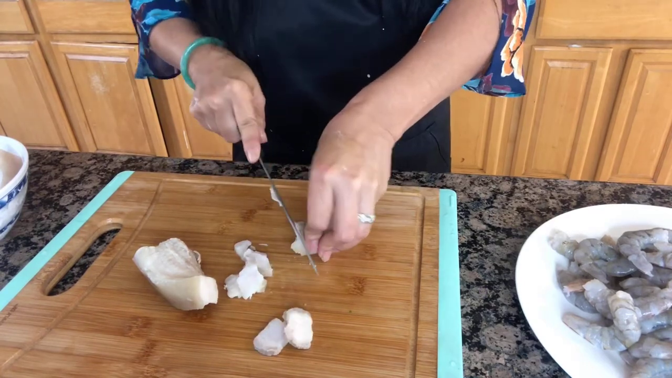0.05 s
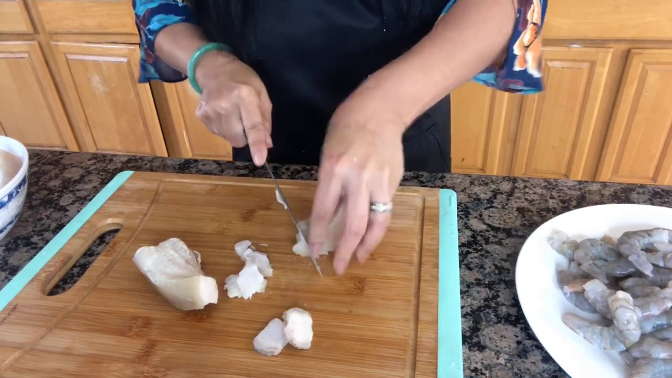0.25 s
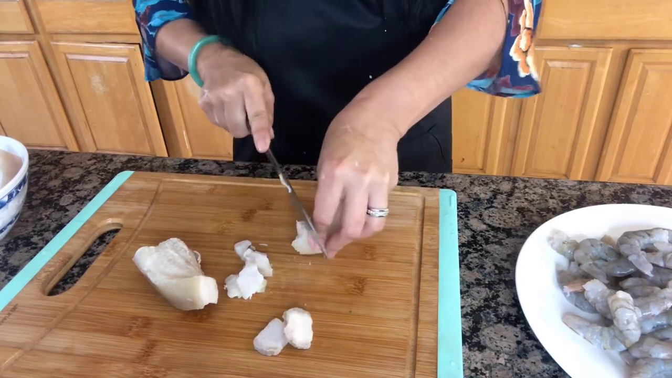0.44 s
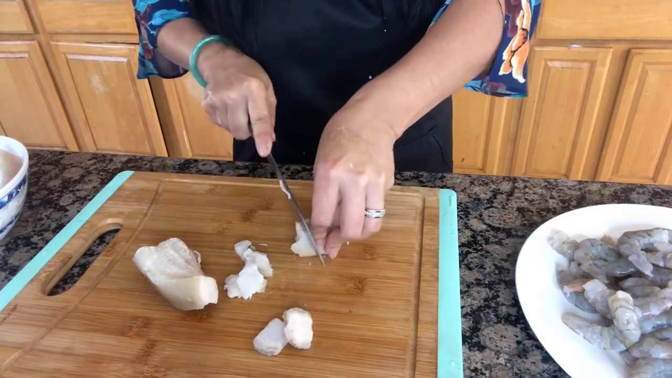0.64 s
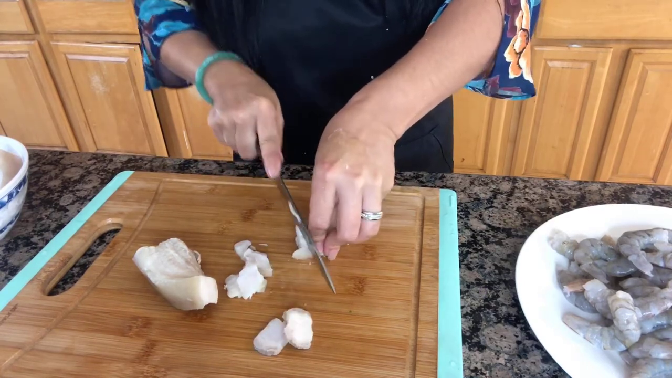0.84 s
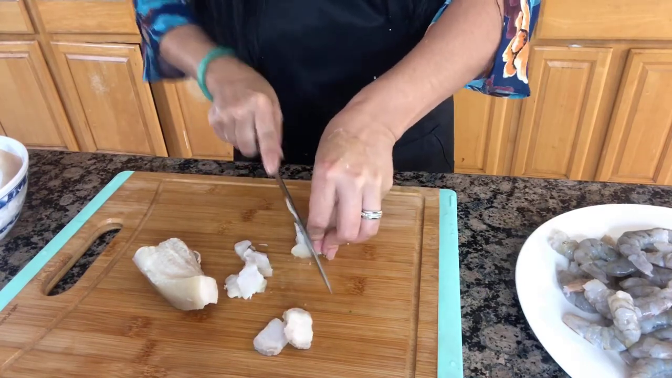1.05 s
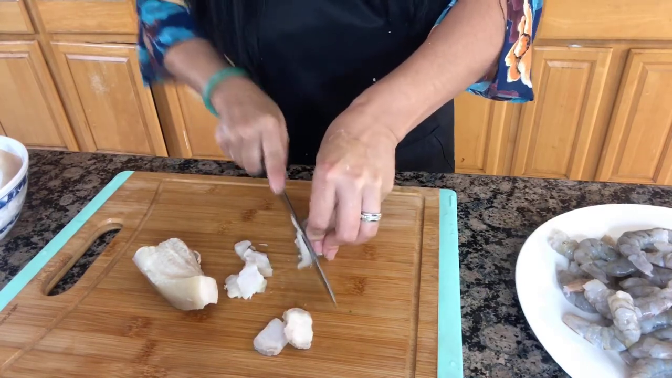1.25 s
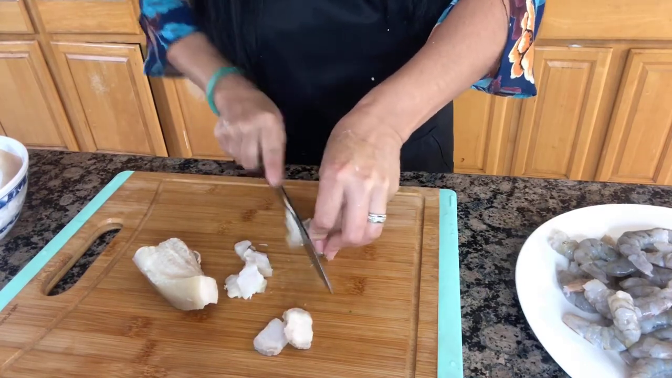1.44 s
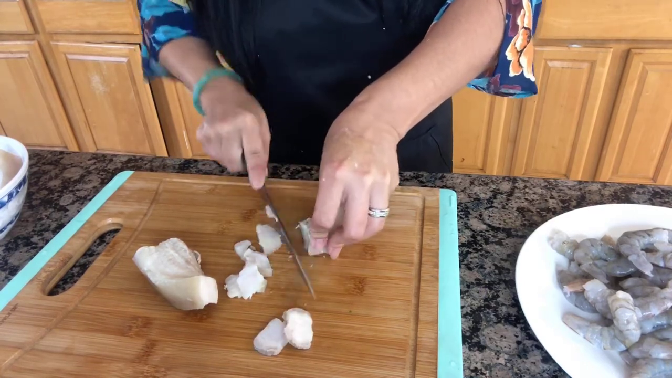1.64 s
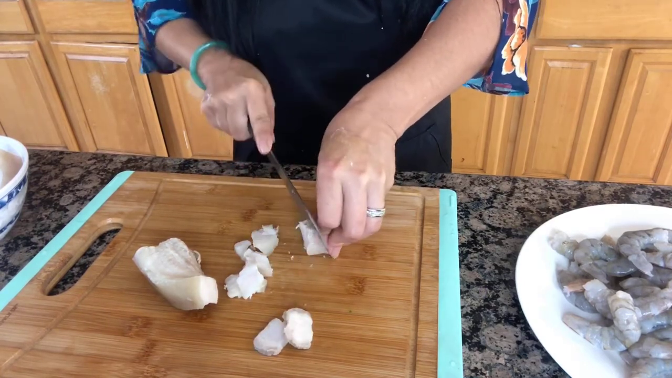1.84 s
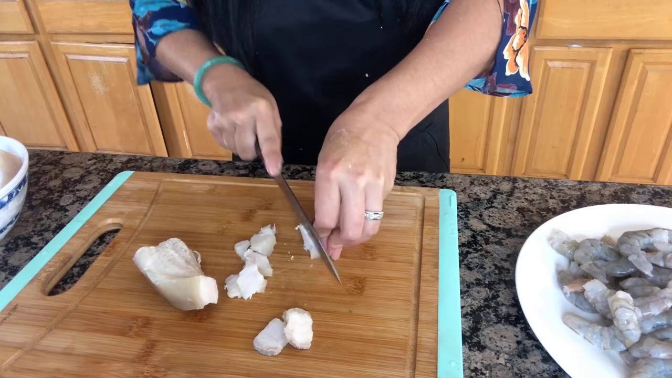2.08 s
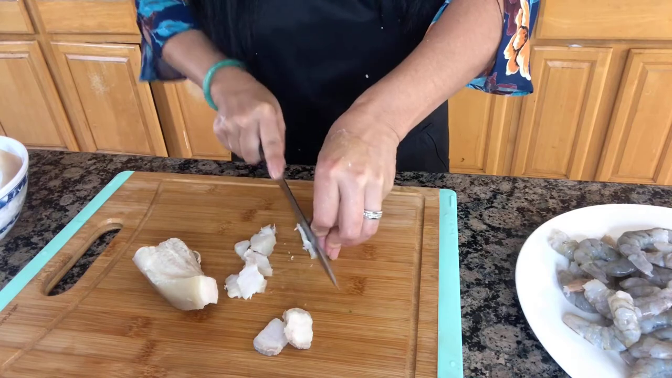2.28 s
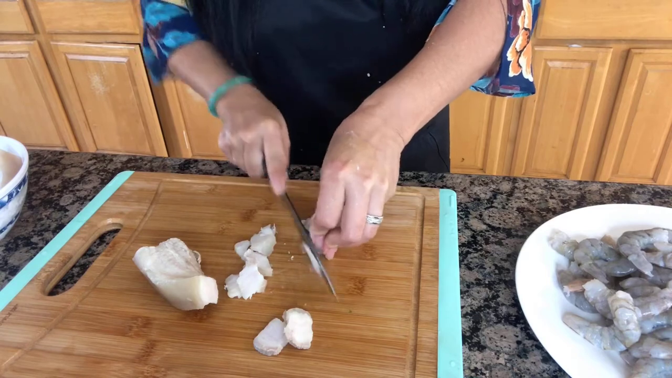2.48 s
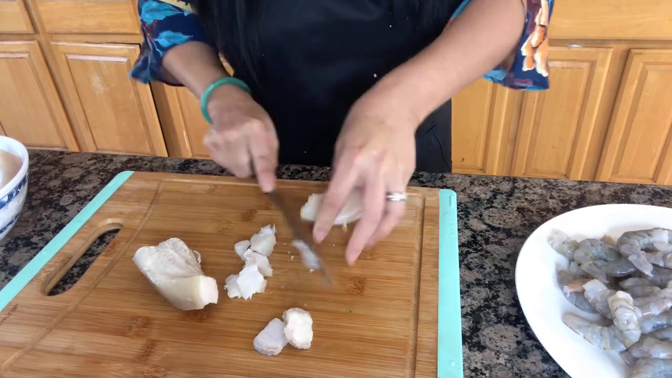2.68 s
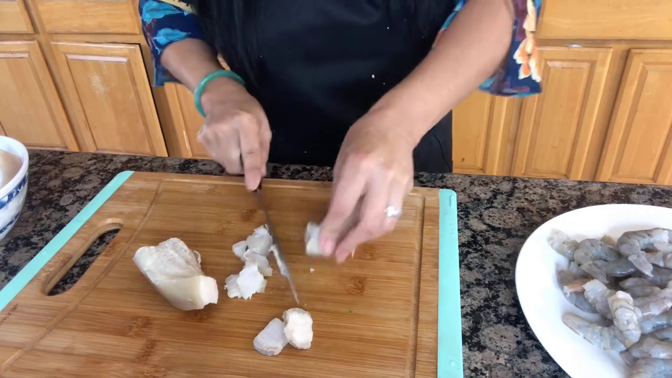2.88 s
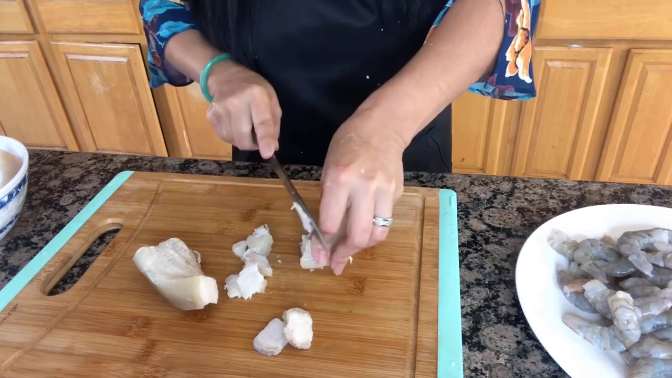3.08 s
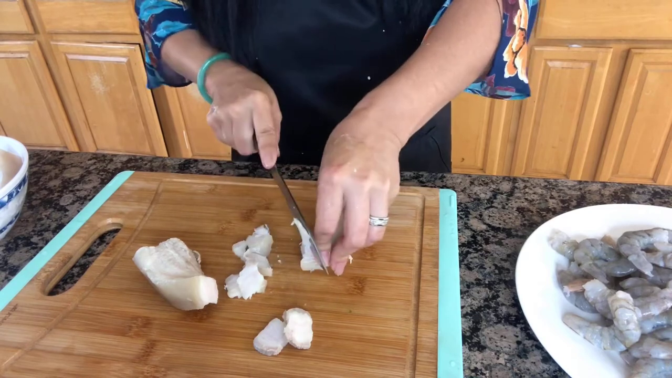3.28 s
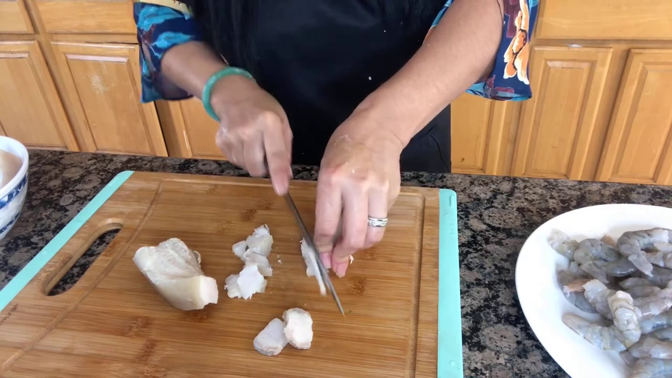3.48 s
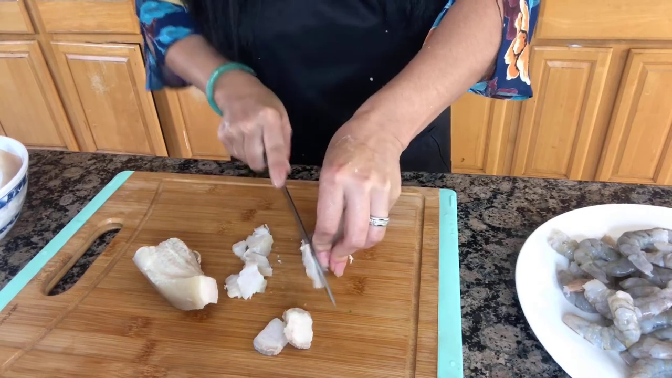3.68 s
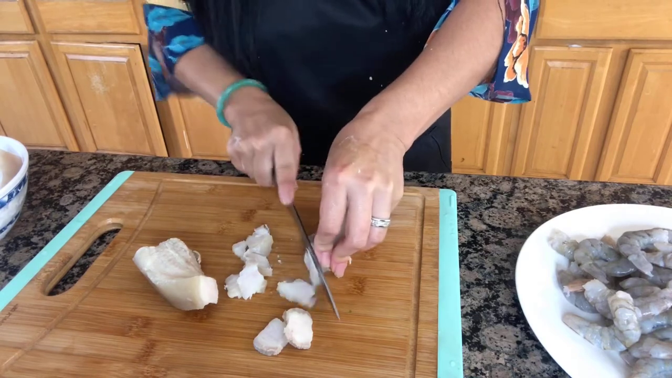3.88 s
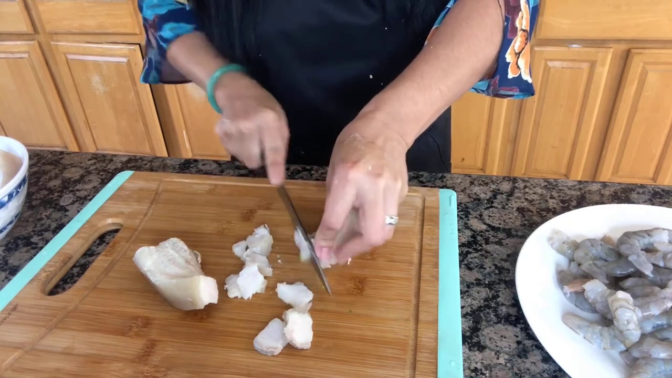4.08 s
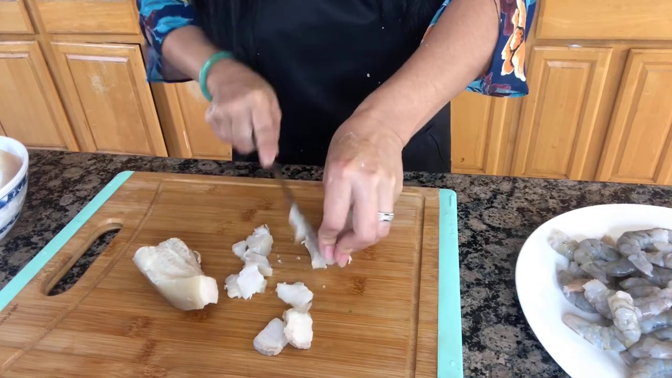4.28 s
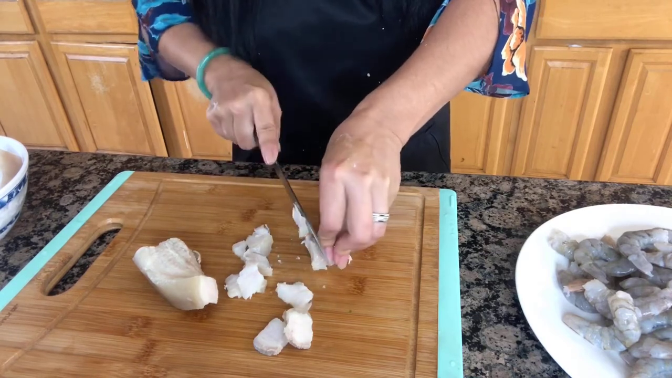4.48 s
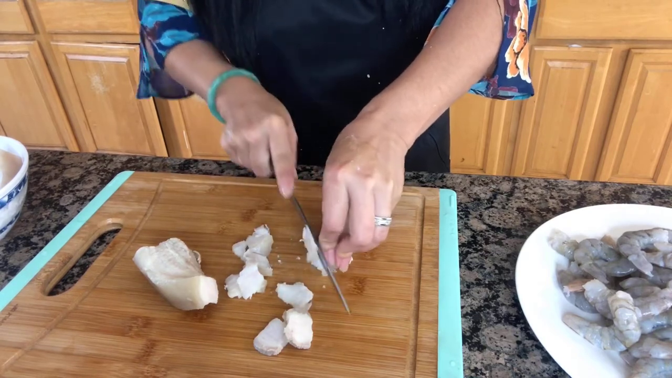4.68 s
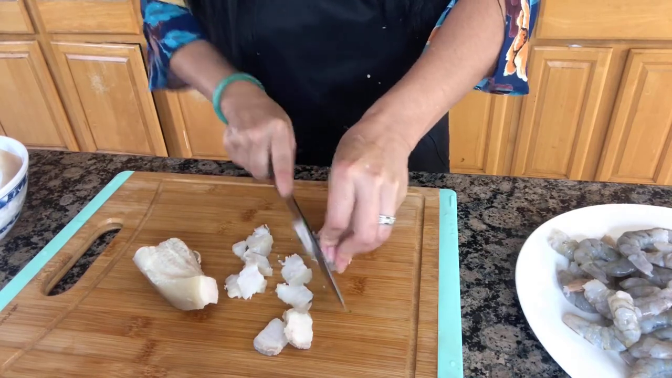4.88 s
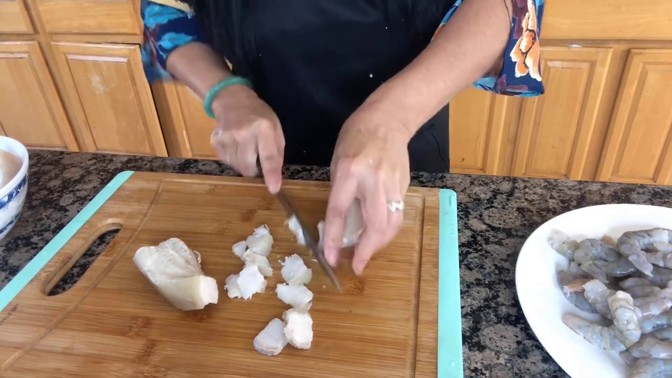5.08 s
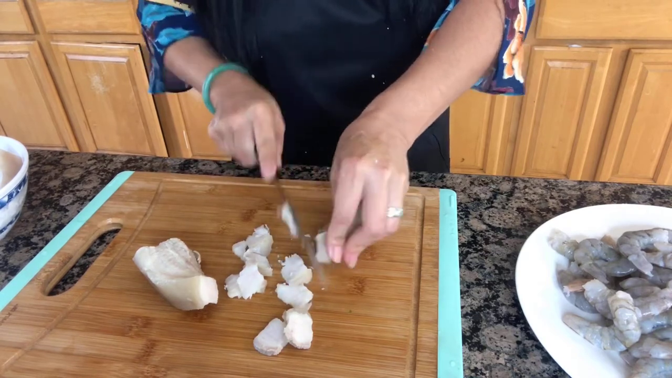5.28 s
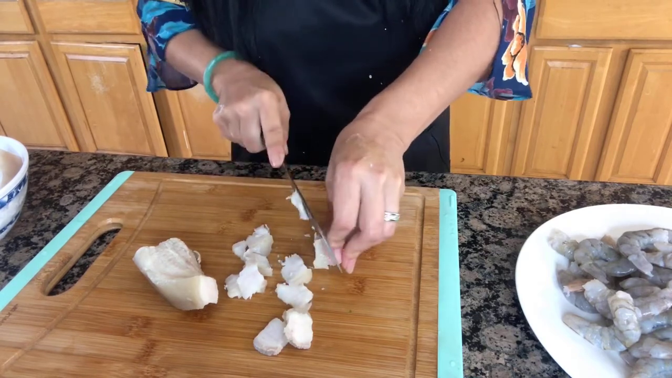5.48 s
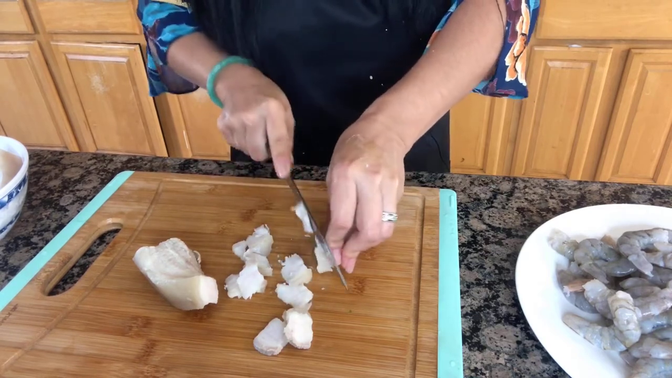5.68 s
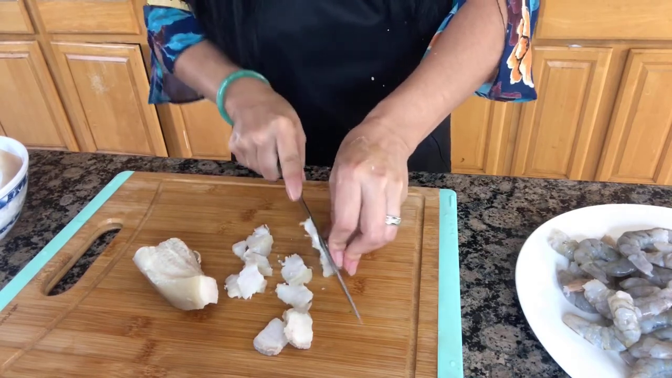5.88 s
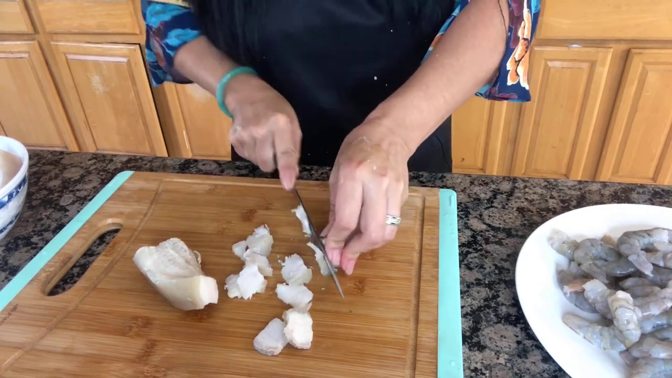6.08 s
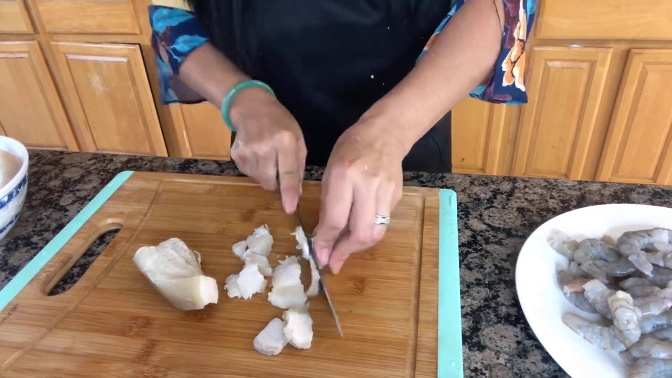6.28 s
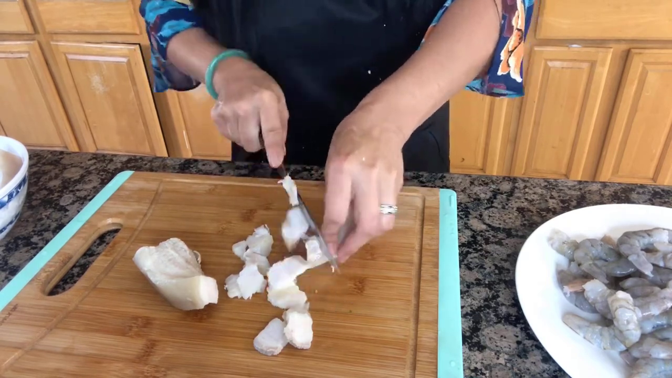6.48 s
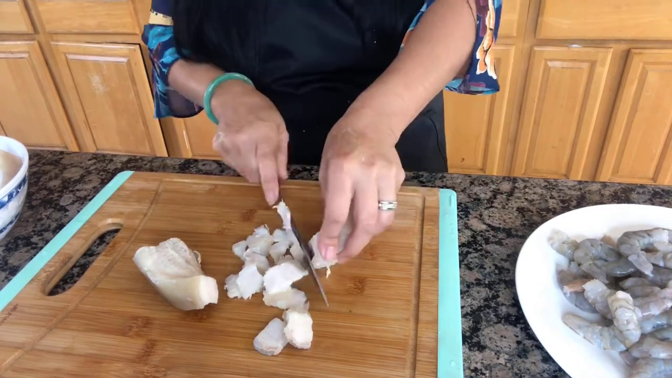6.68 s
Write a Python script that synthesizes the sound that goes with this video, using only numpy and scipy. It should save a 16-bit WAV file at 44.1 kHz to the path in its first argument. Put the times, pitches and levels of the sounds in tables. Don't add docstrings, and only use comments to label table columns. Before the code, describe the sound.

A blade works in four or five brief bursts separated by near-quiet. Each begins with a soft, sticky tearing through fat, then the edge clicks or knocks on a thin bamboo board and scrapes along it with a grainy rasp. Two knocks are far louder, cracking into overload. Close stereo pickup leaning slightly left, short room reverberation, steady dull refrigerator hum, sudden ending.

```python
import sys
import numpy as np
from scipy import signal
from scipy.io import wavfile
from scipy.ndimage import uniform_filter1d

SR = 44100
rng = np.random.default_rng(int(sys.argv[2]) if len(sys.argv) > 2 else 0)


def log_audio(samples):
    frames = np.atleast_2d(samples).T
    limited = np.clip(frames, -1, 1)
    pcm = np.round(limited * 32767).astype(np.int16)
    wavfile.write(sys.argv[1], SR, pcm)


def how_loud(loudness_db):
    steps = np.asarray(loudness_db, float) / 20
    return 10 ** steps


N = 297228


def evened(x):
    return x / np.sqrt(np.mean(x ** 2) + 1e-20)


def read(points, hz):
    f, value = np.transpose(points)
    return np.interp(np.log(hz + 1), np.log(f + 1), value)


def play(events, voice):
    track = np.zeros(N)
    for s, *settings in events:
        sound = voice(*settings)
        part = track[round(s * SR):][:len(sound)]
        part += sound[:len(part)]
    return track


def colour(x, gain_db):
    hz = abs(np.fft.fftfreq(4096, 1 / SR))
    log_gain = np.log(how_loud(np.maximum(gain_db(hz), -100)))
    phase = -signal.hilbert(log_gain).imag
    taps = np.fft.ifft(np.exp(log_gain + 1j * phase)).real[:2048]
    return signal.oaconvolve(x, taps)[:len(x)]


def resonate(x, hz, width):
    turn = np.exp(2j * np.pi * np.cumsum(hz * np.ones(x.shape[-1])) / SR)
    r = np.exp(-np.pi * width / SR)
    return 2 * (turn * signal.lfilter([1 - r], [1, -r], x / turn)).real


def band(x, lo_hz, hi_hz):
    sos = signal.butter(3, [lo_hz, hi_hz], "bandpass", fs=SR, output="sos")
    return evened(signal.sosfilt(sos, x))


def patchy(x, depth_db):
    z = signal.stft(x, nperseg=256, noverlap=192)[2]
    patches = rng.standard_normal(z.shape[::-1]).T
    patches = uniform_filter1d(patches, size=4, axis=0)
    patches = evened(uniform_filter1d(patches, size=22, axis=1))
    return signal.istft(z * how_loud(depth_db * patches), nperseg=256, noverlap=192)[1][:len(x)]


def arch(s, rise_s, fall_s, power):
    late = np.arange(0, N, 32) / SR - s
    return -25 * abs(late / np.where(late < 0, rise_s, fall_s)) ** power


# (frequency [Hz], level [dB per Hz])
WASH_SPECTRUM = [(28, -33.5), (40, -5.5), (65, -14), (90, -28), (130, -7), (220, -7), (320, -5), (480, -10),
                 (640, -12), (1350, -14.5), (1750, -24.5), (2000, -33), (3500, -32.5), (15500, -45)]
# (frequency [Hz], correlation [-1 to 1])
WASH_LIKENESS = [(60, 0.94), (180, 0.86), (550, 0.49), (1650, 0.4), (4970, 0.67), (15000, 0.67)]
# (frequency [Hz], left minus right [dB])
WASH_LEAN = [(60, 2.5), (240, 0.5), (950, 1), (3770, 0.5), (15000, 1)]
# (frequency [Hz], width [Hz], level [dB])
HUM_LINES = [(59.5, 5.8, -67), (120.4, 9.2, -64), (156.6, 9.1, -54), (198.5, 3.7, -72), (292, 6.7, -62.5)]


def fridge(wash_db=-45.5):
    frames, hz = N // 512 + 5, np.fft.rfftfreq(2048, 1 / SR)
    a, b, c, d = rng.standard_normal((frames, 1025, 4)).T
    same, left = read(WASH_LIKENESS, hz)[:, None], a + 1j * b
    right = same * left + np.sqrt(1 - same ** 2) * (c + 1j * d)
    lean_db = np.array([.5, -.5])[:, None] * read(WASH_LEAN, hz)
    z = np.array([left, right]) * how_loud(read(WASH_SPECTRUM, hz) + lean_db)[:, :, None]
    wash = how_loud(wash_db) * evened(signal.istft(z, nperseg=2048, noverlap=1536)[1][:, :N])
    air = rng.standard_normal(N) + .5 * rng.standard_normal((2, N))
    hum = 0
    for f, width, db in HUM_LINES:
        hum = hum + how_loud(db) * evened(resonate(resonate(air, f, width), f, width))
    return wash + hum * how_loud([[.8], [-.8]])


REST_HZ = 1100


def pressure():
    rest_db = np.array([-61, -58, -75.5, -80])
    rest = (rest_db[:, None] + 0 * arch(0, 1, 1, 1), REST_HZ)
    moves = [rest] + cuts() + shudders() + saws()
    power = sum(how_loud(2 * db) for db, hz in moves)
    contact_hz = sum(hz * how_loud(2 * db[0]) for db, hz in moves) / power[0]
    curves = [*np.sqrt(power), contact_hz]
    return [np.interp(np.arange(N), np.arange(0, N, 32), curve) for curve in curves]


# (frequency [Hz], level [dB per Hz])
RUB_SPECTRUM = [(180, -43), (400, 3), (800, -3.5), (1100, 4.5), (1700, -4.5), (2500, -1.5), (3300, -5.5),
                (4700, -4), (6300, -12.5), (8000, -20.5), (11000, -21), (16000, -32.5)]
# (frequency [Hz], width [Hz], level [dB])
RUBBED_MODES = [(829, 100, 0.5), (1066, 43, -2), (1753, 190, 8.5), (2270, 220, -11.5), (3410, 69, -9),
                (3790, 4.8, -14.5), (4500, 11, -13.5), (6140, 110, -19.5)]


def strokes(slips_per_s=4000, spread_db=4, grit_db=3.5, ring_db=6, contact_db=6, contact_width=600):
    *gains, contact_hz = pressure()
    slips = how_loud(spread_db * np.minimum(rng.exponential(1, N), 3)) * (rng.random(N) < slips_per_s / SR)
    grit = evened(slips * rng.choice([-1, 1], N))
    drive = rng.standard_normal(N) + how_loud(grit_db) * grit
    drive = colour(patchy(drive, depth_db=2.1), lambda hz: read(RUB_SPECTRUM, hz))
    modes = sum(resonate(drive, f, width) * how_loud(0.44 * db) for f, width, db in RUBBED_MODES)
    drive = drive + how_loud(ring_db) * modes
    drive = drive + how_loud(contact_db) * resonate(drive, contact_hz, contact_width)
    edges = [(800, 2800), (350, 800), (2800, 7000), (7000, 16500)]  # board, thrum, rasp, fizz [Hz]
    return sum(gain * band(drive, *edge) for edge, gain in zip(edges, gains))


# (deepest at time [s], rasp level [dB], lean-in [s], let-go [s], fizz re rasp [dB])
FAT_CUTS = [(.11, -62, 0.08, 0.18, -7), (.25, -65, .1, 0.13, -15), (.71, -65, 0.089, 0.17, -1),
            (1.05, -54.5, 0.049, .12, 1.5), (1.14, -60, 0.085, .1, -3), (1.22, -54.5, 0.14, .03, 1),
            (2.08, -65.5, 0.18, 0.18, 0), (2.31, -48, 0.066, 0.13, 0), (2.346, -54.5, 0.051, 0.023, 4),
            (3.4, -73, 0.15, 0.35, 1), (3.68, -56, .15, 0.13, -0.5), (3.79, -51.5, 0.041, 0.11, -3),
            (3.845, -54, .05, 0.046, -1), (4.64, -62.5, 0.24, 0.092, 3.5), (4.698, -49.5, 0.04, .015, -2),
            (5.67, -63.5, 0.18, 0.16, -2), (5.78, -64.5, 0.076, 0.13, 2), (5.93, -56.5, 0.093, 0.071, -3.5),
            (5.99, -48.5, 0.082, 0.079, -1.5)]


def cuts(board_db=0, thrum_db=-6, roundness=1.6):
    moves = []
    for s, db, rise_s, fall_s, fizz_db in FAT_CUTS:
        mix_db = np.c_[[board_db, thrum_db, 0, fizz_db]]
        moves.append((db + mix_db + arch(s, rise_s, fall_s, roundness), REST_HZ))
    return moves


# (time [s], peak level [dB], centre [Hz], width [share of the centre])
FAT_TICKS = [(0.136, -34.5, 10400, 0.34), (0.145, -43, 10700, 0.52), (0.3005, -42, 10800, 0.55),
             (1.019, -29, 10900, 0.83), (1.166, -40, 10600, 0.7), (1.2085, -29, 10500, 0.88),
             (1.2291, -21, 8540, 0.46), (1.2386, -17.5, 10500, 0.85), (2.2515, -34.5, 13800, 0.6),
             (2.2673, -34, 10700, 0.79), (3.6368, -36, 11540, 0.25), (3.8633, -15, 7350, 1),
             (3.892, -35, 7840, 0.54), (4.776, -38, 7200, 0.75), (4.808, -37, 8500, .7),
             (5.716, -37, 14300, 0.47), (5.7264, -41, 14500, 0.39), (5.835, -41.5, 9960, 0.6),
             (5.8494, -47, 9920, 0.6), (5.885, -40, 13300, 0.6), (5.8977, -40, 10700, 0.6),
             (5.9663, -39, 11000, 0.8), (6.052, -31.5, 11000, .9)]
# (time [s], peak level [dB], centre [Hz], width [share of the centre])
BLADE_TICKS = [(0.223, -43, 4000, 0.66), (0.2265, -40, 3120, 0.87), (0.265, -45, 3730, 0.6),
               (0.2737, -38, 3860, 0.81), (1.1002, -34, 3560, 0.87), (1.1273, -49, 3610, 0.6),
               (1.1857, -33, 4960, 1), (2.297, -34, 4000, 0.9), (2.6364, -47, 3110, 0.66),
               (3.7134, -47, 5040, 0.6), (3.7898, -41, 3720, 0.6), (3.8, -42, 3480, 0.78),
               (3.8314, -41, 3560, 0.75), (6.0048, -31, 3040, 0.95)]


def tick(db, hz, share, cycles=55):
    t = np.arange(2000) / SR
    burst = rng.standard_normal(len(t)) * how_loud(-60 * t * hz / cycles)
    width = share * hz
    skirt = resonate(burst, hz, width)
    burst = resonate(skirt, hz, width) + .35 * np.diff(skirt, prepend=0)
    return how_loud(db) * burst / abs(burst).max()


# (time [s], peak level [dB], frequency [Hz], t60 [s])
BLADE_RINGS = [
    (2.683, -25, 3470, 0.041),
    (2.683, -31, 5050, 0.035),
    (2.297, -34.5, 5120, 0.015),
    (0.97, -62, 3400, 0.021),
    (3.8579, -14, 1680, 0.014),
]


def ring(db, hz, t60):
    t = np.arange(4000) / SR
    return how_loud(db - 60 * t / t60) * np.sin(2 * np.pi * hz * t)


# (time [s], peak level [dB], place along the board [0-1], crack level [dB],
# damping by the hand [factor on ring time])
BOARD_KNOCKS = [(1.2377, -29.5, 0.3, 6, 0.51), (1.539, -34, 0.4, -6, .9), (2.3622, 7.5, .05, -25.5, 0.53),
                (2.366, -22, 0.06, -31, 0.75), (2.3704, -16.5, 0.6, -32.5, 0.51),
                (2.3872, -21.5, 0.4, -26, 0.51), (2.297, -34, .5, -3.5, .3), (2.487, -22, 0.5, -19, .5),
                (2.681, -33, 0.2, -25, 1.2), (3.8575, -17, 0.1, -10.5, 0.44), (3.8648, -25.5, 0.7, 4, 0.54),
                (4.126, -26.5, 0.36, -10, 1.6), (4.7107, 8, 0.95, -18, 0.55),
                (4.7128, -2.5, 0.99, -35, 0.3), (4.721, -13.5, 0.96, -28, 0.66),
                (4.721, -12, 1, -34.5, 0.54), (5.0845, -13, .95, -21, 0.54), (5.107, -40, 0.7, -25, 0.86),
                (6.0525, -24.5, 0.3, -0.5, 0.42)]
# (frequency [Hz], level [dB], t60 [s])
NEAR_MODES = [(550, -12, 0.15), (830, -2, 0.087), (1064, 1.5, 0.038), (1734, -8, 0.12), (1950, -3.5, 0.026),
              (2262, 6.5, 0.0092), (2820, -20, 0.039), (3837, -31.5, .03), (4320, -46, 0.011)]
# (frequency [Hz], level [dB], t60 [s])
FAR_MODES = [(570, -8.5, 0.13), (1072, -8, 0.06), (1430, 7.5, 0.0347), (1809, -4, 0.067),
             (1910, 1.5, 0.022), (2385, -2.5, 0.043), (2770, -36, 5.0), (3400, -28, 0.035),
             (4362, -28, 0.027), (4581, -34.5, 0.052)]
# (frequency [Hz], level [dB per Hz])
CRACK_SPECTRUM = [(590, -38), (1000, 5.5), (1430, 14.5), (2410, -5), (3380, -9.5), (6780, -28),
                  (16000, -65)]


def knock(db, place, crack_db, damping):
    t = np.arange(8000) / SR

    def ringing(modes):
        total = 0
        for f, level_db, t60 in modes:
            decay_s = np.clip(t60, .005, .1) * damping
            total = total + how_loud(level_db - 60 * t / decay_s) * np.sin(2 * np.pi * f * t)
        return total

    body = -(1 - place) * ringing(NEAR_MODES) - place * ringing(FAR_MODES)
    patch_hz = 2250 - 450 * place
    body -= 0.78 * how_loud(-60 * t / 0.0054) * np.sin(2 * np.pi * patch_hz * t)
    body = signal.lfilter(np.hanning(11), 1, body)
    body = band(np.diff(body, prepend=0) + 0.15 * body, 480, 12000)
    crack = rng.standard_normal(len(t)) * how_loud(-60 * t / 0.0067)
    crack = colour(crack, lambda hz: read(CRACK_SPECTRUM, hz) + 6 * np.log2(hz / 2000 + 0.062))
    return how_loud(db) * (body / abs(body).max() + how_loud(crack_db) * crack / abs(crack).max())


# (time [s], level [dB], dying time [s], low thrum re level [dB], contact resonance [Hz])
BOARD_SHUDDERS = [(1.245, -39, 0.025, 10, 1610), (1.55, -42.5, 0.097, 11, 1390),
                  (1.599, -37.5, .035, 9, 1200), (2.385, -29.5, 0.2, -6, 1115),
                  (2.684, -41, 0.054, 11, 1181), (3.866, -36.5, .03, 1.5, 947),
                  (4.133, -44.5, 0.061, 4, 1427), (4.73, -26.5, 0.11, -1.5, 1598),
                  (5.092, -29, .025, -1, 1900), (5.108, -40, .055, 5, 1100), (6.06, -39.5, .02, 8, 1002)]


def shudders(rise_s=.016, rasp_db=-15, fizz_db=-26.5, roundness=1.06):
    moves = []
    for s, db, fall_s, thrum_db, hz in BOARD_SHUDDERS:
        mix_db = np.c_[[0, thrum_db, rasp_db, fizz_db]]
        moves.append((db + mix_db + arch(s, rise_s, fall_s, roundness), hz))
    return moves


# (hardest at time [s], pressure level [dB], lean-in [s], let-go [s], contact resonance [Hz])
BOARD_SAWS = [(1.25, -35.5, 0.018, 0.077, 1692), (1.39, -33.5, .065, 0.079, 1990),
              (1.435, -36, 0.059, 0.078, 1700), (1.542, -34.5, 0.015, 0.13, 1498),
              (1.585, -31.5, 0.069, 0.044, 1258), (2.43, -32, 0.053, 0.081, 1898),
              (2.48, -37.5, 0.065, 0.036, 1700), (2.602, -42.5, 0.097, 0.27, 1440),
              (2.69, -35.5, 0.08, 0.097, 1290), (3.88, -39.5, 0.037, 0.055, 1380),
              (4.01, -34, 0.079, 0.067, 1850), (4.058, -37, 0.068, .05, 1690),
              (4.133, -36.5, 0.021, 0.046, 1460), (4.85, -32, 0.077, 0.1, 1800),
              (4.905, -36.5, 0.14, 0.075, 947), (5.04, -36.5, 0.072, 0.089, 1150),
              (5.085, -37, 0.064, .04, 1900), (6.005, -43.5, .025, 0.051, 1500),
              (6.11, -37, 0.069, 0.066, 1840)]


def saws():
    mix_db = np.c_[[0.4, -12.5, -4, -12]]
    follow = np.c_[[1.06, 0.55, 1.18, 1.6]]
    roundness = np.c_[[1.8, 2, 2, 2.6]]
    moves = []
    for s, db, rise_s, fall_s, hz in BOARD_SAWS:
        moves.append((db + mix_db + follow * arch(s, rise_s, fall_s, roundness), hz))
    return moves


# (time [s], peak level [dB])
COUNTER_THUMPS = [
    (2.362, -42),
    (2.635, -41),
    (4.711, -45.5),
]


def thump(db):
    return ring(db, hz=70, t60=.15)


# (time [s], level [dB])
WHINE_LEVEL = [
    (3.12, -96),
    (3.2, -76),
    (3.38, -69),
    (3.45, -88),
]


def whine(hz=3380, width=90):
    s, db = np.transpose(WHINE_LEVEL)
    line = resonate(resonate(rng.standard_normal(N), hz, width), hz, width)
    return how_loud(np.interp(np.arange(N) / SR, s, db)) * evened(line)


# (frequency [Hz], t60 [s])
KITCHEN_DECAY = [(300, 0.41), (1500, 0.2), (8000, 0.23)]


def kitchen(x):
    taps = np.zeros((2, SR // 2))
    slots = np.arange(150, SR // 2 - 20, 20)
    at = slots + rng.integers(0, 20, (2, len(slots)))
    np.put_along_axis(taps, at, rng.choice([-1., 1.], at.shape), 1)
    hz, t, z = signal.stft(taps, SR, nperseg=256)
    decay = how_loud(-60 * t / read(KITCHEN_DECAY, hz)[:, None])
    tail = signal.istft(z * decay, SR, nperseg=256)[1]
    return signal.fftconvolve(x[None], tail / np.linalg.norm(tail[0]), axes=1)[:, :N]


# (frequency [Hz], left minus right [dB])
BOARD_LEAN_DB = [(60, 11), (180, 4.5), (550, 2.5), (1650, 2), (4970, 2.5), (15000, -3)]


def scene():
    ticks = play(FAT_TICKS, tick) + play(BLADE_TICKS, tick)
    blows = play(BOARD_KNOCKS, knock) + play(COUNTER_THUMPS, thump)
    board = strokes() + ticks + play(BLADE_RINGS, ring) + blows
    pair = np.array([colour(board, lambda hz: side * read(BOARD_LEAN_DB, hz)) for side in (.5, -.5)])
    return pair + how_loud(-13.5) * kitchen(board) + fridge() + whine()


def top_cut(x):
    return signal.sosfilt(signal.butter(12, 17010, fs=SR, output="sos"), x)


def record(dry):
    lowpass = signal.firwin(255, 15900, window=("kaiser", 8), fs=SR)
    dull = signal.oaconvolve(dry, lowpass[None], "same")
    shaved = dull - np.clip(dull, -1, 1)
    shaved = signal.sosfilt(signal.butter(2, 350, "highpass", fs=SR, output="sos"), shaved)
    clipped = np.clip(dull - shaved, -1, 1)
    stop_s, fade_s = 6.127, 0.001
    gate = np.clip((stop_s - np.arange(N) / SR) / fade_s, 0, 1)
    return top_cut(clipped * gate)


dry = scene()
out = record(dry)
log_audio(out)
```